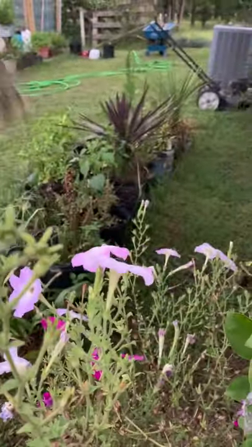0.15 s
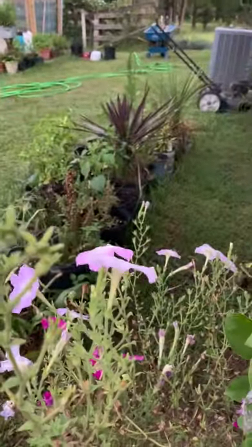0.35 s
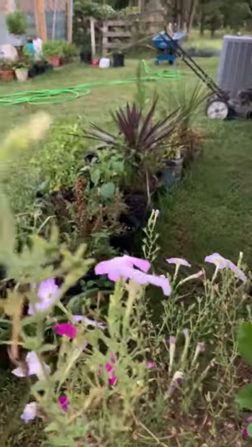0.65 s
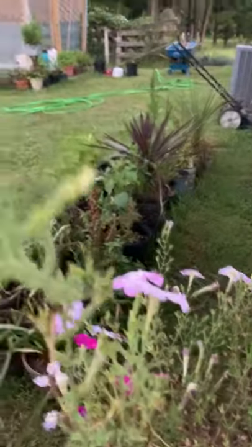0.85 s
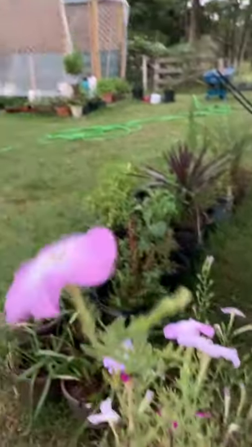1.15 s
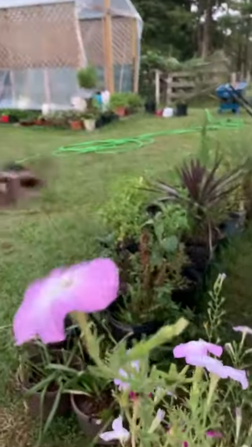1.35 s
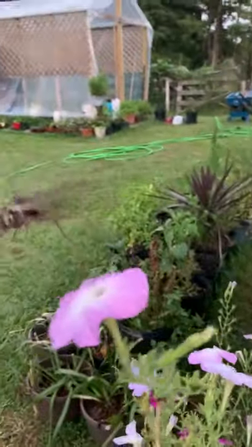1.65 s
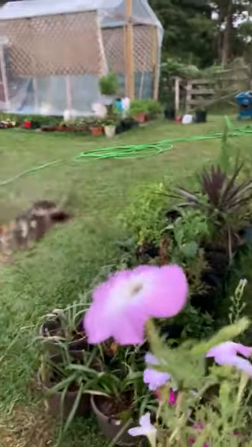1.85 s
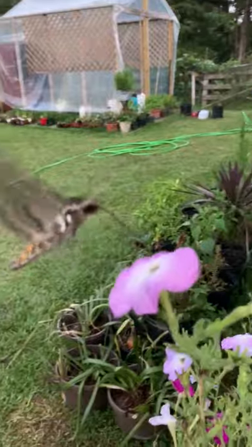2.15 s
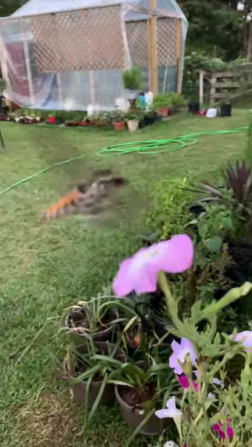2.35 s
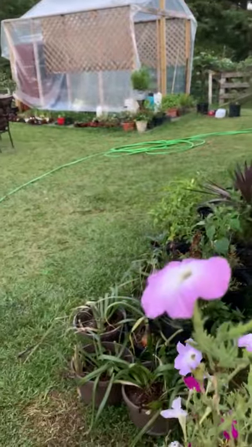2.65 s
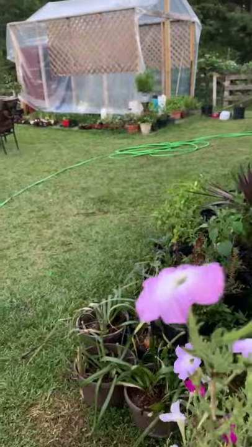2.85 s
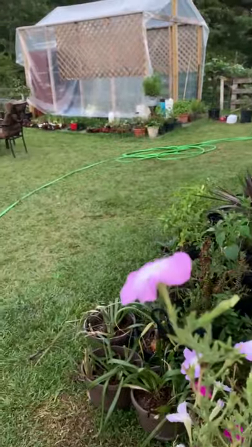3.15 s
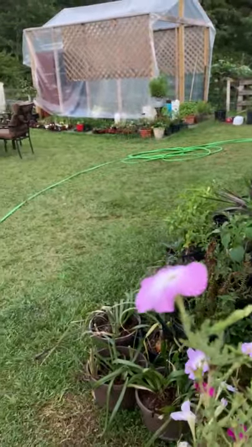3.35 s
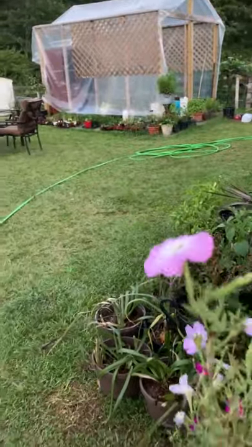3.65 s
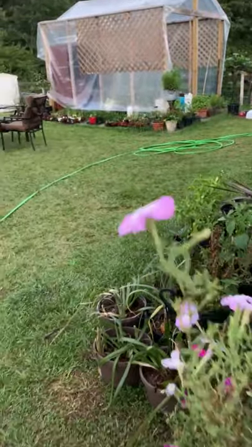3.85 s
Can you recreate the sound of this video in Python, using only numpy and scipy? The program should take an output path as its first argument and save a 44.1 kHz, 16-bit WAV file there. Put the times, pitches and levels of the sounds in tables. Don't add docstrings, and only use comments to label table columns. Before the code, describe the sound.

Cicadas drone steadily in a summer garden with fine insect ticking; a large moth's wings hum low and faint, a stem knocks the handheld phone early, and late the wingbeats thump softly past the microphone.

```python
import sys
import numpy as np
from scipy import signal
from scipy.fft import rfft, irfft
from scipy.io import wavfile
from scipy.ndimage import uniform_filter1d

SR = 44100
rng = np.random.default_rng(int(sys.argv[2]) if len(sys.argv) > 2 else 0)


def convert_level_to_amplitude(level_db):
    exponent = np.asarray(level_db, float) / 20
    return 10 ** exponent


def digitize_waveform(pressure):
    field = np.atleast_2d(pressure).T
    bounded = np.clip(field, -1, 1)
    quanta = np.round(bounded * 32767).astype(np.int16)
    wavfile.write(sys.argv[1], SR, quanta)


N = 176400

# f/Hz, level/dB
CHORUS_SPECTRUM = [(1900, -29), (2600, -6), (3000, -5), (4000, -8.5), (4800, -4.5), (6200, -3.5),
                   (8200, -1), (9900, -5.5)]
CHORUS_DB, CHORUS_TOP_HZ, CHORUS_FLICKER_DB, DIFFUSE_DB = -52, 10006, 1.6, -14

# f/Hz, width/Hz, level/dB
CICADA_MODES = [(6926, 190, -1.5), (7079, 105, 7.5), (7216, 276, 7), (7326, 540, -2), (7920, 110, -0.5)]
CICADA_DB, CLICKS_HZ, CLICK_SCATTER_DB, CICADA_FLICKER_DB = -51.5, 895.6, 1.6, 2
SWELL_HZ, SWELL_DB = 3.9, 1.5

# f/Hz, level/dB
TICK_SPECTRUM = [(10400, -12), (11500, -7), (12500, -2), (13500, 1), (14700, 1), (15500, 1), (16000, 1)]
TICK_HZ, TICK_SLOWS_HZ_PER_S, TICK_AT_S, TICK_MS = 33.0, .18, 1.596, 1.2
TICK_DB, TICK_SCATTER_DB, TICK_HISS = -62, 2.5, .42

THROB_HZ, THROB_TONE_HZ, THROB_WIDTH_HZ = 37.33, 3620, 300
THROB_AT_S, THROB_SHARP, THROB_DB = 1.11, 1.1, -67

# f/Hz, width/Hz, level/dB
TRILL_BANDS = [(2881, 88, -72.5), (3280, 99, -71.5)]

# f/Hz, level/dB
AIR_SPECTRUM = [(30, -1), (65, 3), (110, 2.5), (250, -20), (600, -27), (1500, -27), (2500, -26.5),
                (6000, -30.5), (12000, -48)]
# t/s, level/dB
BREEZE_LEVEL = [(0, 0), (.7, 0), (1.2, -1), (2.3, -2), (2.7, 1.5), (3.3, 1), (4, 1)]
AIR_DB, AIR_FLICKER_DB = -67, 2.5

# t/s, level/dB
CRICKET_LEVEL = [(0, -55), (.8, -52), (1.3, -46), (2, -47), (2.6, -51), (3.2, -52), (4, -54)]
CHIRP_HZ, CHIRP_FALL_HZ, CHIRP_MS, CHIRP_GAP_MS, CHIRP_SKIP = 8800, 400, 2.2, 14.5, .25

# t/s, f/Hz
STROKE_RATE = [(0, 27), (.45, 27), (.5, 25.1), (1.2, 25.3), (2.56, 25.3), (2.59, 27.33), (3.04, 27.33),
               (3.06, 25), (3.6, 25.2)]
# t/s, downstroke level/dB, upstroke re downstroke/dB, eddies re downstroke/dB
HOVER_LEVEL = [(0.0, -101, -26, -25), (0.02, -71.5, -7, -7), (0.2, -59, 1, -6.5), (0.35, -59.5, -9, -12),
               (0.44, -79, 4, -14), (0.51, -49.5, -9, -15.5), (0.71, -47, -15, -21), (0.88, -62, 3, -14),
               (0.9, -52, -2, -10.5), (1.42, -54.5, 3, -25.5), (1.51, -69, -2, -7), (1.55, -57, -10, -12.5),
               (1.88, -64, 4, -12), (2.65, -61.5, 2, -9), (2.75, -78, -9, -27)]
# t/s, downstroke level/dB, upstroke re downstroke/dB, eddies re downstroke/dB
PASS_LEVEL = [
    (2.8, -65, -11, -24),
    (2.9, -47, -19, -11.5),
    (2.98, -31.5, -18, -17),
    (3.015, -30.5, -6, -14.5),
    (3.05, -32.5, -11, -19),
    (3.13, -40, -6, -17),
    (3.17, -33.5, -14, -16),
    (3.25, -41.5, -12, -19.5),
    (3.33, -44, -5, -16.5),
    (3.5, -74, -4, -6),
]
# f/Hz, level/dB
EDDY_SPECTRUM = [(20, -17.5), (50, -2.5), (110, 1.5), (200, -16.5), (400, -23.5), (750, -40), (1000, -64),
                 (2000, -71)]
STROKE_AT_S, STROKE_JITTER_MS, STROKE_SCATTER_DB = 3.0145, 1.3, 1.2
PUFF_MS, UP_MS, UP_AT_CYCLES = 1.8, 3.0, .6
SUCK_DB, SUCK_EARLY_MS, SUCK_MS = -12, 9, 3.55
PORT_HZ, PORT_WIDTH_HZ = 20, 27.7
EDDY_SIDE_DB, HOVER_DULL_HZ, HOVER_PUFF_DB = -7.5, 122, -6.5

# t/s, peak/dB, length/ms, left over right/dB
RUSTLE_EVENTS = [
    (.22, -68, 9.8, 7),
    (.245, -63, 11, 9),
    (.258, -60.5, 3.5, -1),
    (2.325, -59.5, 6.1, 3),
    (2.76, -68.5, 3.4, 4),
    (2.55, -77.5, 78, 3),
    (3.42, -80.5, 7.6, 7),
]
# f/Hz, level/dB
RUSTLE_SPECTRUM = [(300, -6), (800, -19.5), (1350, -1.5), (1750, -6), (2300, -17), (4000, -48)]

# t/s, f/Hz, sway level/dB, hum level/dB, buzz level/dB
HUM_LEVEL = [(0.0, 27.44, -88, -83, -75), (0.28, 27.61, -53, -67, -63), (0.46, 25.96, -76.5, -75, -78),
             (0.52, 24.5, -50.5, -54.5, -60.5), (0.73, 25.3, -50, -48.5, -68.5),
             (0.88, 24.96, -57.5, -65, -61), (0.92, 25.13, -49.5, -50.5, -75),
             (1.09, 25.3, -52, -66.5, -63), (1.42, 25.87, -53.5, -56.5, -66),
             (1.48, 25.8, -62, -65.5, -69.5), (1.66, 25.18, -60, -58, -67),
             (1.91, 25.51, -57.5, -62.5, -62.5), (1.93, 25.48, -67, -72, -64),
             (2.13, 25.54, -58.5, -54.5, -67.5), (2.38, 24.99, -85, -56, -70), (2.59, 27.67, -61, -51, -63),
             (2.66, 27.49, -56, -72, -70), (2.78, 26.2, -72.5, -65, -72)]
# t/s, level re buzz/dB
RASP_LEVEL = [(0, -14), (.13, -5), (.33, -5), (.45, -17), (.62, -4), (.85, -17.5), (2.4, -23), (2.55, -5.5),
              (2.75, -23)]
HUM_THIRD_DB, HUM_FIFTH_DB, RASP_FALL_DB = -3.5, -6.5, -3
HUM_WAVER_DB, HUM_WAVER_HZ, HUM_DRIFT_RAD = 3, 11, 0.68

# t/s, peak/dB, length/ms, left over right/dB
BUMP_EVENTS = [
    (.8752, -29.5, 2.2, -2),
    (.9121, -21.5, 1.7, -2.5),
    (.9215, -33.5, 5, -3),
    (.848, -48, 28, -2.5),
    (.915, -40, 12, -3),
    (.95, -48, 19, -3),
    (.8805, -39, 2, -2),
    (.932, -39, 2, -3),
]
# f/Hz, level/dB, t60/s
CASE_MODES = [(710, 13.5, 0.065), (1750, -17, 0.11), (2236, -28, 0.3), (2850, 0, 5.0), (3080, -5, 5.0),
              (4180, 11.5, 0.02), (4000, 1, 0.022), (5700, -16, 0.33)]
# f/Hz, level/dB
SCRAPE_SPECTRUM = [(200, 1.5), (500, -9), (720, -6), (1050, -2.5), (1600, 7), (3000, 9), (4900, -6),
                   (15500, -15.5)]
CASE_RING, CASE_DB, CRACKLE_DB, KNOCK_LAG_SAMPLES = 0.37, -7.5, 1.5, 6

# t/s, peak/dB
SNAP_EVENTS = [(0.999, -55), (1.113, -64), (1.232, -58), (1.3517, -63), (1.378, -53), (1.706, -51),
               (2.0536, -56), (2.183, -50.5), (2.2484, -64), (2.3061, -62), (2.4, -61)]
SNAP_HZ, SNAP_WIDTH_HZ, SNAP_MS = 11800, 1800, 7

# t/s, peak/dB
PORT_TICK_EVENTS = [
    (1.035, -52),
    (2.8, -66),
    (2.87, -62),
    (2.983, -40),
    (3.047, -54),
]
PORT_TICK_HZ, PORT_TICK_MS = 3300, 1.0

# t/s, peak/dB, length/ms
FIZZ_EVENTS = [(1.09, -70, 30), (1.19, -66, 50), (1.29, -65, 60), (1.44, -71, 40), (1.97, -70, 50),
               (2.09, -69, 40), (2.22, -69, 60), (2.36, -69, 40), (2.46, -69, 30)]
FIZZ_HZ, FIZZ_WIDTH_HZ = 12000, 800

# f/Hz, left lead/rad
PORT_LEAD = [(0, 0), (1500, .6), (2500, 2.3), (3450, 1.1), (16050, .97 + 6 * np.pi), (23000, 30)]

WHOLE_BLOCKS_S = [.56, .86, .91, 2.25, 3.02, 3.6]
WEAKER_DB, QUIET_DB = -7, -98
WEAK_ABOVE_HZ, QUIET_ABOVE_HZ, TOP_HZ = 1800, 10400, 15830


def unit(x):
    return x / np.sqrt(np.mean(x ** 2))


def noise():
    return rng.standard_normal(N)


def colour(x, table):
    hz, db = np.array(table, float).T
    bins_hz = np.arange(N // 2 + 1) * SR / N
    gain_db = np.interp(np.log(bins_hz + 1), np.log(hz), db, left=-90)
    return unit(irfft(rfft(x) * convert_level_to_amplitude(gain_db), N))


def ring(x, hz, width_hz):
    return signal.lfilter(*signal.iirpeak(hz, hz / width_hz, SR), x)


def ring_noise(hz, width_hz, second_width_hz):
    return unit(ring(ring(noise(), hz, width_hz), hz, second_width_hz))


def walk(rate_hz):
    hold = int(SR / rate_hz)
    steps = np.repeat(rng.standard_normal(N // hold + 1), hold)
    return 1.6 * uniform_filter1d(uniform_filter1d(steps, hold), hold)[:N]


def curve(table, axis=1):
    return np.interp(np.arange(N) / SR, [r[0] for r in table], [r[axis] for r in table])


def bells(times_s, gains, ms):
    keep = (times_s > 0) & (times_s < (N - 2) / SR)
    d = np.arange(-600, 601) / SR * 1000 / ms
    shape = 0.64 * np.exp(-.5 * d ** 2) + 0.26 * np.exp(-.5 * ((d + 0.36) / 1.71) ** 2)
    hits = np.bincount((times_s[keep] * SR).astype(int), gains[keep], N)
    return signal.fftconvolve(hits, shape, "same")


def bursts(rows):
    t, out = np.arange(N) / SR, np.zeros((2, N))
    for s, db, ms, pan_db in rows:
        since_ms = np.maximum(t - s + 0.0006, 0) * 1000
        gain = convert_level_to_amplitude(db + np.array([[pan_db], [-pan_db]]) / 2)
        rise = 1 - np.exp(-since_ms / (0.49 * ms))
        out += gain * rise * np.exp(-since_ms / ms) * 3.13
    return out


def chorus():
    bands = 0
    for hz in 1800 * 1.2 ** np.arange(11):
        bands = bands + convert_level_to_amplitude(CHORUS_FLICKER_DB * walk(14)) * ring(noise(), hz, hz / 5)
    hiss = colour(np.diff(bands, prepend=0) * .3 + bands, CHORUS_SPECTRUM)
    top = signal.ellip(6, .5, 40, CHORUS_TOP_HZ, fs=SR, output="sos")
    return signal.sosfilt(top, hiss) * convert_level_to_amplitude(CHORUS_DB)


def cicadas():
    t = np.arange(N) / SR
    chance = rng.random((12000, 2)).T
    times_s = np.cumsum(-np.log(1 - chance[0])) / CLICKS_HZ / 3
    size = convert_level_to_amplitude(-CLICK_SCATTER_DB * np.log(1 - chance[1]))
    keep = times_s < t[-1]
    clicks = np.bincount((times_s[keep] * SR).astype(int), size[keep], N) * np.sign(noise())
    body = 0
    for hz, width_hz, db in CICADA_MODES:
        mode = unit(ring(ring(clicks, hz, width_hz), hz, 2 * width_hz))
        body = body + convert_level_to_amplitude(db + CICADA_FLICKER_DB * walk(9.76)) * mode
    swell_db = SWELL_DB * np.sin(2 * np.pi * SWELL_HZ * t) + 0.089 * walk(0.65)
    return unit(body) * convert_level_to_amplitude(CICADA_DB + swell_db)


def katydid():
    t = np.arange(N) / SR
    since_s = t - TICK_AT_S
    cycles = TICK_HZ * since_s - TICK_SLOWS_HZ_PER_S / 2 * since_s ** 2
    gains = convert_level_to_amplitude(TICK_SCATTER_DB * rng.standard_normal(140))
    ticks = bells(np.interp(np.arange(-56, 84), cycles, t, -1, -1), gains, TICK_MS)
    return (ticks + TICK_HISS * convert_level_to_amplitude(walk(54))) * colour(noise(), TICK_SPECTRUM) * convert_level_to_amplitude(TICK_DB)


def throb():
    t = np.arange(N) / SR
    gate = np.exp(THROB_SHARP * (np.cos(2 * np.pi * THROB_HZ * (t - THROB_AT_S)) - 1))
    tone = ring(ring(noise(), THROB_TONE_HZ, THROB_WIDTH_HZ), THROB_TONE_HZ, 2 * THROB_WIDTH_HZ)
    return unit(gate * tone) * convert_level_to_amplitude(THROB_DB)


def trills():
    return sum(convert_level_to_amplitude(db + 1.7 * walk(5.84)) * ring_noise(hz, w, w) for hz, w, db in TRILL_BANDS)


def air():
    mid = colour(noise(), AIR_SPECTRUM) * convert_level_to_amplitude(AIR_FLICKER_DB * walk(22))
    no_bass = signal.butter(2, 260, "high", fs=SR, output="sos")
    side = signal.sosfilt(no_bass, colour(noise(), AIR_SPECTRUM))
    return convert_level_to_amplitude(AIR_DB + curve(BREEZE_LEVEL)) * (mid + side * np.array([[1], [-1]]))


def cricket():
    chance = rng.random((300, 3)).T
    gaps = 1 + 0.031 * (chance[0] - .5) + 0.53 * (chance[1] < CHIRP_SKIP)
    times_s = np.cumsum(CHIRP_GAP_MS / 1000 * gaps)
    d = np.arange(-400, 401) / SR * 1000 / CHIRP_MS
    phase = 2 * np.pi * np.cumsum(CHIRP_HZ - CHIRP_FALL_HZ * d / 2) / SR
    chirp = np.exp(-.5 * d ** 2) * np.sin(phase)
    keep = times_s < N / SR
    hits = np.bincount((times_s[keep] * SR).astype(int), convert_level_to_amplitude(-6 * chance[2][keep]), N)
    return signal.fftconvolve(hits, chirp, "same") * convert_level_to_amplitude(curve(CRICKET_LEVEL))


def wing_puffs():
    t, levels = np.arange(N) / SR, HOVER_LEVEL + PASS_LEVEL
    cycles = np.cumsum(curve(STROKE_RATE)) / SR
    cycles -= cycles[int(STROKE_AT_S * SR)]
    beat, chance = np.arange(-85, 30), rng.standard_normal((115, 4)).T
    jitter_s = STROKE_JITTER_MS / 1000
    down_s = np.interp(beat, cycles, t) + chance[0] * jitter_s
    up_s = np.interp(beat + UP_AT_CYCLES, cycles, t) + chance[2] * jitter_s
    down_gain, up_gain = convert_level_to_amplitude(STROKE_SCATTER_DB * chance[1]), convert_level_to_amplitude(STROKE_SCATTER_DB * chance[3])

    down = bells(down_s, down_gain, PUFF_MS)
    up = bells(up_s, up_gain, UP_MS)
    suck = bells(down_s - SUCK_EARLY_MS / 1000, down_gain, SUCK_MS)
    pressure = down + convert_level_to_amplitude(curve(levels, axis=2)) * up - convert_level_to_amplitude(SUCK_DB) * suck
    poles = signal.iirpeak(PORT_HZ, PORT_HZ / PORT_WIDTH_HZ, SR)[1]
    puffs = signal.lfilter([1, -2, 1], poles, pressure) * 6.08

    low = signal.butter(2, HOVER_DULL_HZ, fs=SR, output="sos")
    dull = signal.sosfiltfilt(low, puffs) * convert_level_to_amplitude(HOVER_PUFF_DB + 4.0 * walk(16))
    near = np.clip((t - PASS_LEVEL[0][0]) / .05 + 1, 0, 1)
    puffs = near * puffs + (1 - near) * dull

    gate = (1.19 + uniform_filter1d(down, 300)) * convert_level_to_amplitude(curve(levels, axis=3)) * 1.38
    side = convert_level_to_amplitude(EDDY_SIDE_DB) * colour(noise(), EDDY_SPECTRUM) * np.array([[1], [-1]])
    eddies = gate * (colour(noise(), EDDY_SPECTRUM) + side)
    fade = np.clip((3.75 - t) / 0.54, 0, 1)
    return (puffs + eddies) * convert_level_to_amplitude(curve(levels)) * fade


def leaf_rustle():
    shared = colour(noise(), RUSTLE_SPECTRUM)
    own = np.array([colour(noise(), RUSTLE_SPECTRUM) for _ in range(2)])
    return 0.69 * bursts(RUSTLE_EVENTS) * (shared + 1.4 * own)


def wing_hum():
    turn = 2 * np.pi * np.cumsum(curve(HUM_LEVEL)) / SR
    sway, two, buzz = (curve(HUM_LEVEL, axis=k) for k in (2, 3, 4))
    levels = [sway, two, (two + buzz) / 2 + HUM_THIRD_DB, buzz, buzz + HUM_FIFTH_DB]
    levels += [buzz + curve(RASP_LEVEL) + k * RASP_FALL_DB for k in range(3)]
    stack = 0
    for k, db in enumerate(levels, 1):
        gain = convert_level_to_amplitude(db + HUM_WAVER_DB * walk(HUM_WAVER_HZ))
        stack = stack + gain * np.cos(k * turn + HUM_DRIFT_RAD * walk(3.95))
    fade = np.clip((HUM_LEVEL[-1][0] - np.arange(N) / SR) / 0.032, 0, 1)
    return np.sqrt(2) * stack * fade


def stem_on_case():
    rub = colour(noise(), SCRAPE_SPECTRUM)
    shared = np.array([np.roll(rub, KNOCK_LAG_SAMPLES), rub])
    crackle = convert_level_to_amplitude(CRACKLE_DB * (walk(500) - 0.9))
    own = np.array([colour(noise(), SCRAPE_SPECTRUM) for _ in range(2)])
    scrape = bursts(BUMP_EVENTS) * crackle * (shared + 0.54 * own)
    modes = 0
    for hz, db, t60_s in CASE_MODES:
        modes = modes + convert_level_to_amplitude(db) * ring(scrape, hz, 1.8 / (CASE_RING * min(t60_s, .3)))
    return .5 * scrape + 1.73 * convert_level_to_amplitude(CASE_DB) * modes


def leaf_snaps():
    rows = [(s, db, SNAP_MS, 0) for s, db in SNAP_EVENTS]
    return 0.26 * bursts(rows)[0] * ring_noise(SNAP_HZ, SNAP_WIDTH_HZ, SNAP_WIDTH_HZ)


def port_ticks():
    rows = [(s, db, PORT_TICK_MS, 0) for s, db in PORT_TICK_EVENTS]
    return bursts(rows) * ring_noise(PORT_TICK_HZ, 2500., 3000.) * np.array([[1], [-.3]])


def leaf_fizz():
    rows = [(s, db, ms, 0) for s, db, ms in FIZZ_EVENTS]
    return bursts(rows)[0] * ring_noise(FIZZ_HZ, FIZZ_WIDTH_HZ, FIZZ_WIDTH_HZ)


def ports(x):
    hz, rad = np.array(PORT_LEAD).T
    turn = np.exp(.5j * np.interp(np.arange(N // 2 + 1) * SR / N, hz, rad))
    return irfft(rfft(x) * np.array([turn, turn.conj()]), N)


def scene():
    touches = stem_on_case() + leaf_rustle()
    snaps = leaf_snaps()
    touches += port_ticks()
    insects = chorus() + cicadas() + throb() + trills() + cricket() + katydid()
    far = ports(insects + snaps + leaf_fizz())
    diffuse = convert_level_to_amplitude(DIFFUSE_DB) * np.array([chorus(), chorus()])
    moth = wing_puffs() + wing_hum()
    return far + diffuse + moth + touches + air()


def gate_bands(x):
    mid_side = np.array([x[0] + x[1], x[0] - x[1]]) / 2
    z = signal.stft(mid_side, SR, nperseg=2048)[2]
    band_power = (abs(z[:, :1024]) ** 2).reshape(2, 64, 16, -1).mean(axis=2)
    power = np.repeat(band_power, 16, axis=1)
    hz = np.arange(1024)[:, None] * SR / 2048
    weak = (power < power[::-1] * convert_level_to_amplitude(2 * WEAKER_DB)) & (hz > WEAK_ABOVE_HZ)
    quiet = (power < convert_level_to_amplitude(2 * QUIET_DB)) & (hz > QUIET_ABOVE_HZ)
    whole = np.isin(np.arange(z.shape[2]), np.round(np.array(WHOLE_BLOCKS_S) * SR / 1024))
    z[:, :1024] *= ~(quiet | (weak & ~whole)) & (hz < TOP_HZ)
    mid, side = signal.istft(z, SR, nperseg=2048)[1][:, :N]
    return np.array([mid + side, mid - side])


def band_limit(x):
    return signal.sosfilt(signal.butter(12, 16750, fs=SR, output="sos"), x)


def record(dry):
    mix = gate_bands(dry)
    return band_limit(mix)


dry = scene()
out = record(dry)
digitize_waveform(out)
```